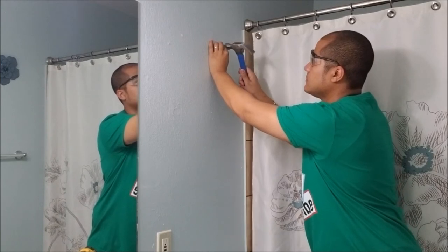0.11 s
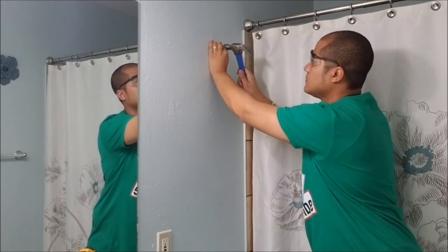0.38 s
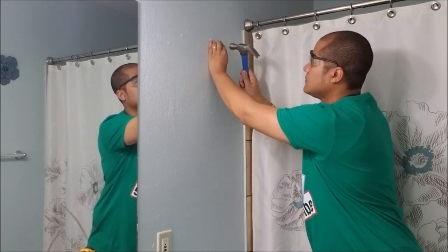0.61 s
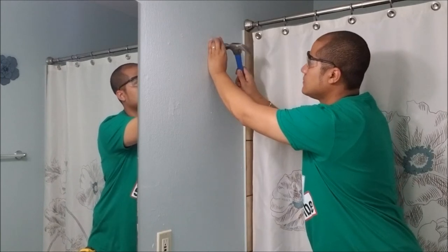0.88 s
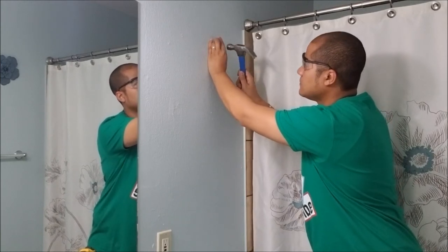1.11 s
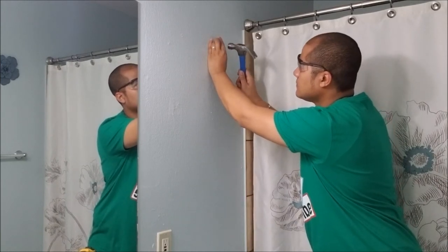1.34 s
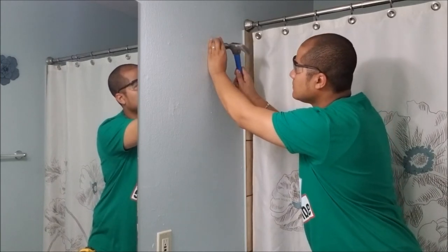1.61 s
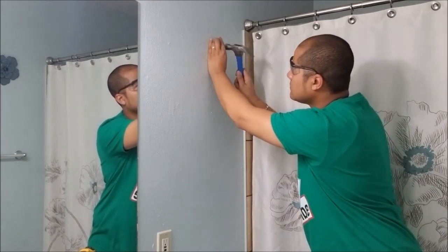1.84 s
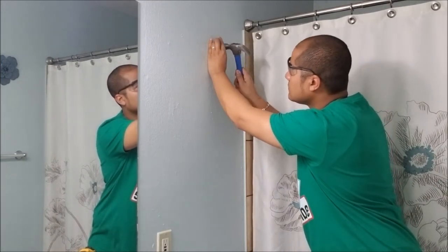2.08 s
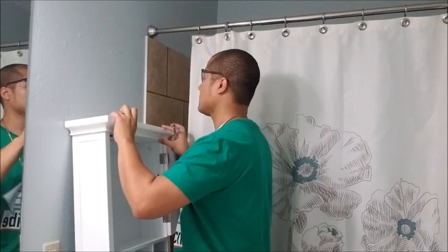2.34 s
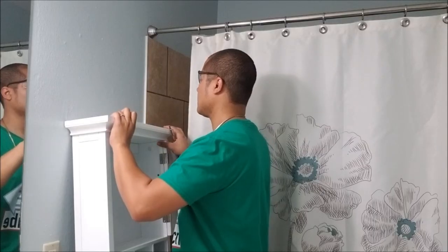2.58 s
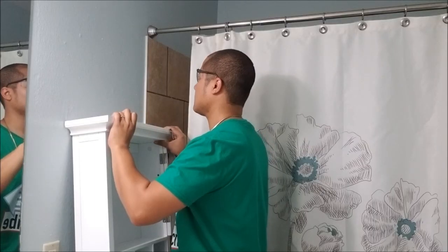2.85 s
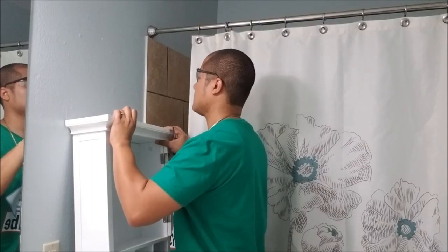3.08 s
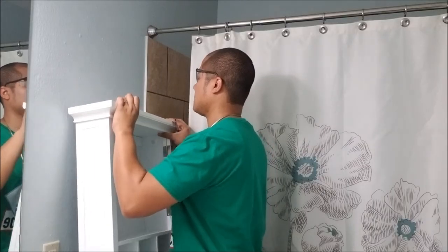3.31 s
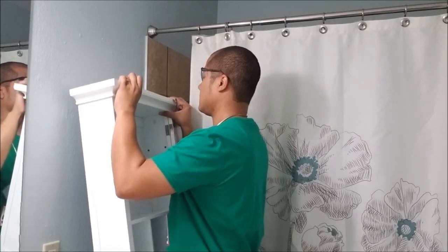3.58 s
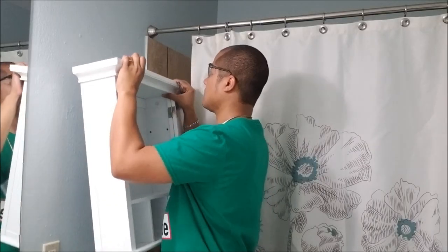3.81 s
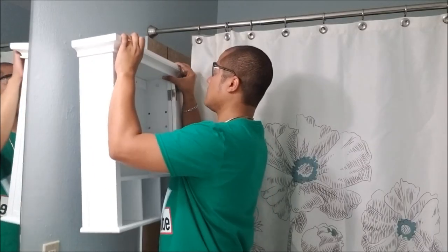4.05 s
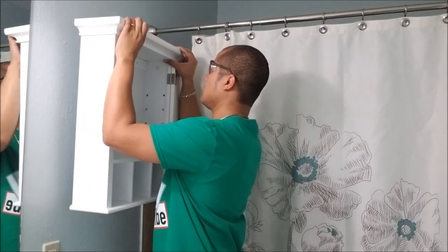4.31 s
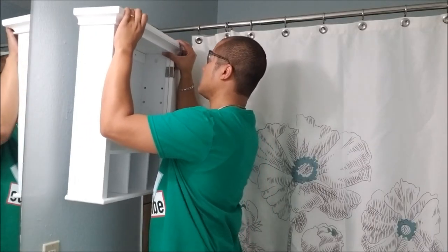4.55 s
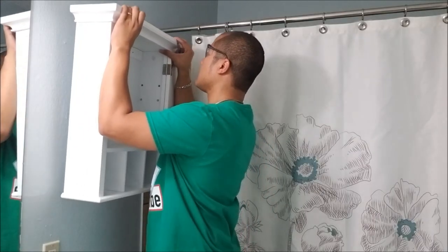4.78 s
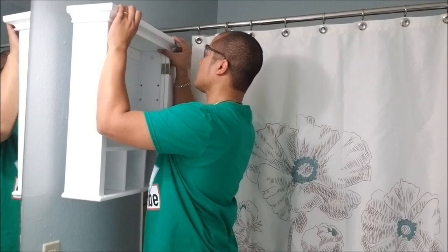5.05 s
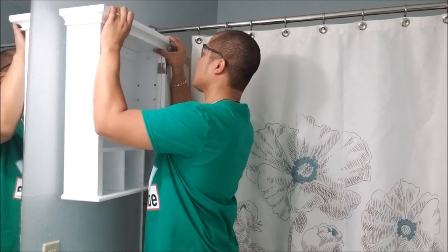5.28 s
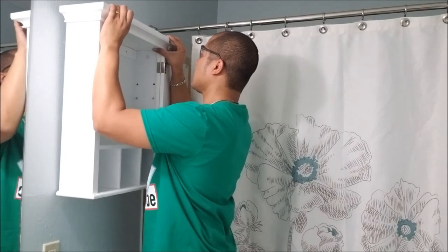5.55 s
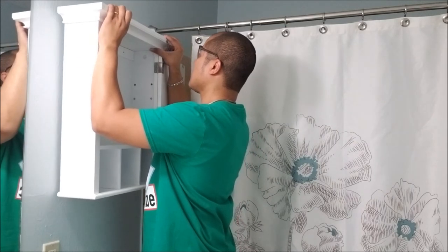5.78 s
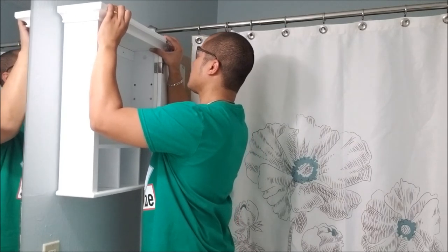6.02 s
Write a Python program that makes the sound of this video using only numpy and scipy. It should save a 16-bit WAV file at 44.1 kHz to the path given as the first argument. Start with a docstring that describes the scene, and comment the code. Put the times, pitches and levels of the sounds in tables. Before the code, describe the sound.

Six uneven hammer blows on a hollow wall, then cloth rustle, wooden knocks and stuttering slides over low room hum, ending in a heavy bump.

```python
"""In a small tiled bathroom, a hammer taps an anchor into a hollow wall, and the blows grow deeper and boomier.
Then a wooden cabinet is set down, slid up the wall with stutters and knocks, and bumped into place.
Cloth rustles over a low, wavering room hum, with small ticks, swishes, a clack and a scrape.
Hits ring the decaying tones (modes) of wall, cabinet and hammer head; fading noise makes their room echo.
Rubbing and hum are coloured noise; sliding wood is a stream of random grains that ring the cabinet."""
import sys
import numpy as np
from scipy import signal
from scipy.io import wavfile
from scipy.ndimage import uniform_filter1d, minimum_filter1d

SR = 44100
rng = np.random.default_rng(int(sys.argv[2]) if len(sys.argv) > 2 else 0)


def generate_wav(signal):
    """Clip the signal to [-1, 1] and save it as 16-bit WAV at the path in sys.argv[1]."""
    frames = np.transpose(np.atleast_2d(signal))
    scaled = np.clip(frames, -1, 1) * 32767
    pcm = np.round(scaled).astype(np.int16)
    wavfile.write(sys.argv[1], SR, pcm)


def invert_db(level):
    """Linear amplitude ratio for a level in decibels (20 dB per decade), elementwise."""
    return 10 ** (np.asarray(level, dtype=float) / 20)


N = 271215
LEAD = 8820   # samples made ahead of time 0, then cut off

# hammer blows: (time [s], strength [dB], boom over the knock [dB], crack over the knock [dB], snap [dB])
BLOWS = [(-0.11, -5.5, -3.5, -13, -8), (0.1987, -11.5, -4, -5.5, 0), (0.4676, -16.5, -4, -5.5, -3),
         (0.92, -15.5, -2.5, -8, -4), (1.2575, -7.5, 0.5, -8.5, 1.5), (1.6086, -4.5, 2.5, -11, -9.5),
         (1.9745, -5, 2, -14, -13)]
# ringing tones of the cabinet: (pitch [Hz], level [dB], time to fall 60 dB [s])
CABINET = [(76, -11, 0.12), (112.1, -1, 0.44), (172.9, -2.5, 0.32), (215.3, 0, 0.26), (285, 0, 0.18),
           (396, -3, 0.13), (518, -8, 0.12), (545, -8.5, 0.23), (588, 1, 0.14), (649, -6, 0.13),
           (821, -7, 0.053), (948.6, -1, 0.069), (1053, -14, 0.15), (1343, -11, 0.035), (1680, -1, 0.083),
           (2030, -11, 0.075), (2700, -8.5, 0.18), (2970, -7, 0.12), (4100, -9, 0.12), (4600, -7, 0.081),
           (5200, -10.5, 0.15), (5730, -1, 0.055), (6900, 4, 0.055), (11450, 0, 0.037)]


def rms_one(x):
    """Scales a sound to an average (rms) strength of 1."""
    return x / np.sqrt(np.mean(x ** 2) + 1e-20)


def clock():
    """Time of every sample in seconds, negative during the lead."""
    return (np.arange(N + LEAD) - LEAD) / SR


def in_time(rows):
    """Level curve in dB, fading to silence outside its span."""
    s, db = np.transpose(rows)
    return np.interp(clock(), [s[0] - .02, *s, s[-1] + .02], [-120, *db, -120], left=-120)


def at_hz(points, hz):
    """Reads a curve at a pitch, with straight lines over log pitch."""
    points = np.array(points)
    return np.interp(np.log(hz), np.log(points[:, 0]), points[:, 1])


def clicks(times, sizes):
    """Single-sample pulses that start the decays."""
    out = np.full(N + LEAD, 1e-18)
    np.add.at(out, np.round(np.asarray(times) * SR).astype(int) + LEAD, sizes)
    return out


def ring(x, hz, t60):
    """A resonance: a click of size 1 starts a sine of height 1 that falls 60 dB in t60 seconds."""
    r, w = invert_db(-60 / (t60 * SR)), 2 * np.pi * hz / SR
    return signal.lfilter([0, np.sin(w)], [1, -2 * r * np.cos(w), r * r], x)


def drift(rate):
    """Slow random wandering of spread 1, smoothed twice at rate [Hz]."""
    r = np.exp(-80 * np.pi * rate / SR)   # one step is 40 samples
    slow = signal.lfilter([1], [1, -2 * r, r * r], rng.standard_normal((N + LEAD) // 40 + 2002))[2000:]
    return np.interp(np.arange(N + LEAD) / 40, np.arange(len(slow)), rms_one(slow))


def band_noise(low, high, order=2):
    """Noise of rms 1 between two pitches [Hz]."""
    sos = signal.butter(order, [low, high], "band", fs=SR, output="sos")
    return rms_one(signal.sosfilt(sos, rng.standard_normal(N + LEAD)))


def bands():
    """Splits noise into third-octave bands: centre [Hz], width [Hz] and a noise of rms 1 each."""
    edges_hz = 40 * 2 ** np.arange(0, 8.9, 1 / 3)
    white = rng.standard_normal((2, N + LEAD))
    for k, (low, high) in enumerate(zip(edges_hz, edges_hz[1:])):
        sos = signal.butter(2, [low, high], "band", fs=SR, output="sos")
        yield np.sqrt(low * high), high - low, rms_one(signal.sosfilt(sos, white[k % 2]))


def coloured(spectrum, patchy_db, bank):
    """Adds noise bands along a spectrum, each flickering a little; rms 1."""
    out = 0
    for hz, width, noise in bank:
        out = out + noise * np.sqrt(width) * invert_db(at_hz(spectrum, hz) + patchy_db * drift(8.9))
    return rms_one(out)


def ring_modes(at, parts, modes, ring_db):
    """Each contact pushes every mode of a body, with random strength and direction."""
    soft_cycles = 0.37   # a push is smoothed over this many cycles of its mode
    chance = rng.standard_normal((len(at), 2 * len(modes)))
    out = 0
    for k, (hz, level_db, t60) in enumerate(modes):
        # boom drives modes up to 300 Hz, knock up to 1500, crack up to 5000, tick those above
        push_db = parts[:, np.searchsorted([300, 1500, 5000], hz)]
        size = invert_db(push_db + level_db + ring_db + 2 * chance[:, 2 * k]) * np.sign(chance[:, 2 * k + 1])
        soft = np.exp(-hz / (soft_cycles * SR))
        gain = (1 - soft) * np.hypot(1, 2 * np.pi * soft_cycles)   # makes up for the smoothing
        out = out + ring(signal.lfilter([gain], [1, -soft], clicks(at, size)), hz, t60)
    return out


def struck(rows, modes, bank, ring_db, snap_db, tail_db, tail_share, top_tilt_db, build_s):
    """Each contact gives a short snap, rings the body's modes and leaves a room tail that dies band by band."""
    # middles [Hz] and widths [Hz] of the four parts: boom, knock, crack, tick
    part_hz = [150, 700, 2700, 8500]
    part_width_hz = [220, 1200, 3500, 9000]
    # how long the room rings: (pitch [Hz], time to fall 60 dB [s], later scaled by tail_share)
    room_t60 = [(60, 0.2), (160, 0.48), (420, 0.45), (1100, 0.34), (2910, 0.3), (7680, 0.29)]
    build_cycles = 2.5   # low echoes need at least this many cycles to build up
    rows = np.array(rows)
    at, snap, parts = rows[:, 0], rows[:, 1], rows[:, 2:]
    out = ring_modes(at, parts, modes, ring_db)
    per_hz = parts - 10 * np.log10(part_width_hz)
    loudest = np.maximum(per_hz[:, 2], per_hz[:, 3] + 6)
    brief = invert_db(-120 / (.008 * SR))   # snap energy falls 60 dB in 8 ms
    for hz, width, noise in bank:
        db = np.array([at_hz(list(zip(part_hz, p)), hz) for p in per_hz])
        # tilts in dB per octave, above 9000 Hz and below 90 Hz
        db += top_tilt_db * max(np.log2(hz / 9000), 0) - 14.0 * max(np.log2(90 / hz), 0)
        # echoes build up, then fade; low down, where the modes ring, they are weaker
        build = np.exp(-1 / (max(build_s, build_cycles / hz) * SR))
        fade = invert_db(-120 / (tail_share * at_hz(room_t60, hz) * SR))
        start_db = db + tail_db - 6.04 * np.clip(np.log2(1500 / hz), 0, 1)
        tail = clicks(at, invert_db(2 * start_db))   # doubled dB: energy
        energy = signal.lfilter([1 - build], np.convolve([1, -fade], [1, -build]), tail)
        if hz > 900:
            burst_db = np.minimum(db - loudest, 0) + snap + snap_db
            energy += signal.lfilter([1], [1, -brief], clicks(at, invert_db(2 * burst_db)))
        out = out + noise * np.sqrt(np.abs(energy) * width)
    return out


def without_deep_bass(x):
    """What lies below 68 Hz is cut, so the struck sounds carry no deep bass."""
    return signal.sosfilt(signal.butter(4, 68, "high", fs=SR, output="sos"), x)


def strokes(rows):
    """Loudness of rubbing strokes that swell, hold and let go."""
    attack_s, release_s = 0.065, 0.11
    gain = 0
    for s, length, db in rows:
        shape = np.interp(clock(), [s - attack_s, s, s + length, s + length + release_s], [0, 1, 1, 0])
        gain = gain + invert_db(db) * shape ** 2
    return gain


def blow_parts():
    """Splits the hammer blows into rows of (time [s], snap, boom, knock, crack, tick [dB])."""
    s, strength, weight, hardness, snap = np.transpose(BLOWS)
    crack = strength + hardness
    return np.transpose([s, snap, strength + weight, strength, crack, crack - 12])


def hammer(bank):
    """Hammer blows shake the hollow wall, which booms in its own modes."""
    # ringing tones of the wall: (pitch [Hz], level [dB], time to fall 60 dB [s])
    wall = [(79, -18, .3), (97.7, -9, 0.27), (115.35, -2, 0.43), (143.8, -9.5, 0.27), (167.8, -3, 0.46),
            (190.4, -1.5, 0.45), (215.3, -8, 0.4), (267, -8, 0.45), (382.3, -4.5, 0.39), (507.4, -17, 0.34),
            (533.6, -7, 0.36), (578, -5, 0.25), (613, -8, 0.22), (654, -15, 0.28), (720, -14.5, 0.37),
            (784, -15.5, .3), (860, -13, 0.3), (966, -14, 0.29), (1026, -21, 0.18), (1133, -10.5, 0.19),
            (1319, -22.5, 0.34), (1344, -17, 0.33), (1500, -10, 0.16), (1714, -2.5, 0.28)]
    return without_deep_bass(struck(blow_parts(), wall, bank, ring_db=-4.0, snap_db=-45, tail_db=-2.5,
                                    tail_share=1.054, top_tilt_db=-29.5, build_s=0.0026))


def head():
    """Steel on plastic: a few short high modes, struck a little differently each time."""
    # ringing tones of hammer head and anchor: (pitch [Hz], level [dB], time to fall 60 dB [s])
    head_modes = [(1800, -2, 0.012), (2960, -13.5, .008), (5150, -13, 0.017), (6410, -8.5, .012),
                  (7100, -9.5, 0.011), (11000, -5.5, .006), (13500, -15.5, 0.0065)]
    rows = np.array(BLOWS)
    chance = rng.standard_normal((len(rows), len(head_modes)))
    out = 0
    for k, (hz, db, t60) in enumerate(head_modes):
        sizes = invert_db(rows[:, 4] + db - 7.5 + 5.0 * chance[:, k])
        out = out + ring(clicks(rows[:, 0], sizes), hz, t60)
    return out


def rumble():
    """The deepest bass swells a moment after each contact shakes the wall."""
    floor_db, swell_db = -56, -41.5
    follows, crest_s = 0.23, 0.033   # share of the boom's dB that is added; time to the crest
    contacts = np.vstack([blow_parts(), knock_parts()])
    r = np.exp(-1 / (crest_s * SR))
    pushes = clicks(contacts[:, 0], invert_db(2 * (swell_db + follows * contacts[:, 2])))
    swell = signal.lfilter([np.e * (1 - r)], [1, -2 * r, r * r], pushes)
    return np.sqrt(invert_db(2 * floor_db) + np.abs(swell)) * band_noise(22, 38)


def hum(bank):
    """Low room hum: coloured noise that jumps louder near 2.3 s, then drifts."""
    # course of the hum: (time [s], level [dB])
    hum_level = [(0, -41), (.8, -48), (2.27, -50.5), (2.4, -37.5), (4.3, -42), (5.3, -44), (6.15, -42)]
    # colour of the hum: (pitch [Hz], level per Hz [dB])
    hum_colour = [(12, -39), (20, -36), (70, -3), (123, 1.5), (198, 3), (434, -19), (574, -12.5),
                  (780, -21), (1290, -36), (3160, -43), (9670, -47.5), (14300, -58), (16000, -66.5)]
    return invert_db(in_time(hum_level)) * coloured(hum_colour, .5, bank)


def rustle(bank):
    """Cloth and skin rub: coloured noise follows the effort of the arms."""
    # course of the rubbing: (time [s], level [dB])
    rustle_level = [(0, -67.5), (.75, -66), (1.3, -67.5), (2.25, -73.5), (2.48, -55), (2.95, -61.5),
                    (3.15, -63), (3.7, -53.5), (4.05, -53), (4.32, -59.5), (4.79, -53), (4.98, -63.5),
                    (5.5, -68), (5.8, -74)]
    # colour of the rubbing: (pitch [Hz], level per Hz [dB])
    rustle_colour = [(710, -18), (1200, 4), (1660, -5), (1790, -0.5), (2200, -7), (2560, -5.5),
                     (11300, -13), (13900, -26.5), (16000, -15)]
    return invert_db(in_time(rustle_level)) * coloured(rustle_colour, .7, bank[12:])   # from 640 Hz up


def ticks():
    """Tiny touches of hard edges ring two short modes each."""
    # ticks and pings, lower mode: (time [s], level [dB], pitch [Hz], time to fall 60 dB [s])
    touches = [(0.0957, -48, 11000, .005), (0.295, -45, 11500, .005), (0.4184, -42, 6000, .004),
               (0.4675, -14.5, 5600, .012), (0.641, -45, 10500, .004), (0.7846, -45, 9500, .003),
               (0.9205, -17, 5150, 0.027), (1.2575, -13, 6060, 0.016), (1.5673, -54, 5200, .008),
               (2.156, -45, 7070, 0.023), (2.67, -38, 4500, 0.027), (2.7201, -32, 4540, 0.036),
               (2.848, -36, 4900, 0.022), (5.9663, -42, 3030, 0.036)]
    out = 0
    for s, db, hz, t60 in touches:
        out = out + ring(clicks([s], invert_db(db)), hz, t60)
        out = out + ring(clicks([s], invert_db(db - 4.5)), 1.14 * hz, 0.52 * t60)
    return out


def swishes():
    """A hand brushes paint: bright noise under bell-shaped swells."""
    # brushes: (time of the crest [s], level [dB], length from crest to 1/e [s])
    brushes = [(0.734, -65.5, .09), (2.504, -49, 0.034), (4.78, -53.5, 0.061), (5.325, -57, 0.021),
               (5.401, -59, 0.032), (5.602, -57.5, 0.032)]
    t = clock()
    return band_noise(7000, 13000) * sum(invert_db(db) * np.exp(-((t - s) / length) ** 2) for s, db, length in brushes)


def knock_parts():
    """Splits the cabinet contacts into rows like the hammer's: the harder the touch, the more treble."""
    # cabinet touching wall, hand and ledge:
    # (time [s], strength [dB], boom over the knock [dB], tick over the knock [dB])
    knocks = [(2.3217, -40.5, -4, -3.5), (2.4872, -25.5, -20, -23), (2.534, -33.5, -1, -30),
              (2.57, -39, -16, -6.5), (2.631, -53, 0, -11), (2.6698, -34.5, -17, -9),
              (2.7198, -33, 2, -1.5), (2.7388, -20, 12, -31), (2.823, -33.5, 16.5, -13),
              (2.8488, -28.5, 3, -7.5), (2.973, -33, -9, -21), (3.699, -26.5, -1.5, -27),
              (3.8484, -29.5, -15, -31), (3.8877, -28.5, -24, -29), (3.92, -25.5, -5, -30),
              (3.9765, -24, -3, -26.5), (4.0788, -31.5, 0, -32), (4.149, -32.5, -12, -23),
              (4.2532, -28.5, -25, -28), (4.2796, -28, -1, -26.5), (4.3081, -26.5, -12, -27.5),
              (4.3608, -29, -3.5, -25), (4.4677, -29, -2, -27), (4.547, -27.5, -1, -26),
              (4.6354, -27.5, 2, -31), (4.664, -26.5, -2, -31), (4.6918, -25, -5, -31),
              (4.8579, -45.5, 2, 2.5), (4.924, -35, -1, -18), (5.013, -31, 2.5, -25.5),
              (5.065, -40, 9, -24), (5.1596, -33.5, -10, -24.5), (5.229, -33.5, 3, -25),
              (5.3454, -29.5, -18, -29.5), (5.6304, -26, 1, -50), (5.967, -15, 10, -36.5),
              (5.9868, -22.5, 14, -23)]
    s, strength, weight, hardness = np.transpose(knocks)
    tick = strength + hardness
    crack = strength + 0.8 * hardness
    return np.transpose([s, tick + 13.5, strength + weight, strength, crack, tick])


def cabinet(bank):
    """The wooden cabinet knocks and bumps, ringing its own modes."""
    return without_deep_bass(struck(knock_parts(), CABINET, bank, ring_db=-7.5, snap_db=-43.5, tail_db=-7.0,
                                    tail_share=0.99, top_tilt_db=-16, build_s=0.00083))


def clack():
    """A loose panel clacks: a snap, then fading noise shakes the panel's broad resonances."""
    # the clack: (time [s], snap level [dB], body level [dB], fall time [s], shortened below)
    s, snap_db, body_db, t60 = (2.3375, -15.5, -19.5, 0.3959)
    # resonances of the panel: (pitch [Hz], width [Hz], at least 40 is used, level [dB])
    panel = [(587, 52, 3), (970, 130, -2), (1385, 65, -3), (1617, 67, -13), (2000, 44, -15),
             (2620, 62, -13.5), (3040, 31, -24), (3800, 120, -24), (4060, 33, -13), (4670, 200, -17),
             (5090, 80, -15.5), (5600, 31, -10), (5660, 35, -22), (6200, 38, -33), (6760, 22, -44),
             (7840, 54, -46), (10900, 21, -37), (11900, 170, -31)]
    t = np.arange(SR // 2) / SR
    white = rng.standard_normal(len(t))
    body = 0
    for hz, width, db in panel:
        r = np.exp(-np.pi * max(width, 40) / SR)
        echoes = white * invert_db(-60 * t / t60 * (1.5 + hz / 30000))   # high echoes die sooner
        poles = [1, -2 * r * np.cos(2 * np.pi * hz / SR), r * r]
        body = body + invert_db(db) * signal.lfilter([(1 - r * r) / 2, 0, (r * r - 1) / 2], poles, echoes)
    # a gap where the panel hardly radiates
    body = signal.sosfilt(signal.butter(2, [3150, 3550], "bandstop", fs=SR, output="sos"), body)
    body = signal.sosfilt(signal.butter(2, 6800, fs=SR, output="sos"), body)
    body /= np.std(body[:SR // 30])
    snap = invert_db(snap_db - 60 * t / 0.01) * signal.lfilter([.5, .5], [1, -.4], rng.standard_normal(len(t)))
    out, at = np.zeros(N + LEAD), round(s * SR) + LEAD
    out[at:at + len(t)] = invert_db(body_db) * body + snap
    return out


def slide():
    """Wood sticks and slips on the wall: uneven grains shake the middle modes of the cabinet."""
    # strokes of the slide: (start [s], length [s], level [dB])
    slide_strokes = [(2.46, 0.65, -49), (3.55, 0.19, -46), (3.92, 0.15, -37.5), (4.26, 0.12, -44.5),
                     (4.45, 0.88, -54)]
    born = rng.random(N + LEAD) < 500 * invert_db(2.5 * drift(25)) / SR   # around 500 grains a second
    sizes = born * invert_db(4.5 * np.minimum(rng.exponential(1, N + LEAD), 4))
    out = 0
    for hz, level_db, t60 in CABINET[5:14]:
        grains = sizes * rng.standard_normal(N + LEAD) + 1e-18
        out = out + invert_db(level_db) * ring(grains, hz, 0.5 * t60)   # dies twice as fast as when struck
    return rms_one(out) * strokes(slide_strokes)


def whistle():
    """Dragging wood whistles faintly: noise through one narrow resonance at 2000 Hz."""
    # whistling strokes: (start [s], length [s], level [dB])
    whistle_strokes = [(4.27, 0.3, -57.5), (5.41, 0.15, -71)]
    return rms_one(ring(rng.standard_normal(N + LEAD), 2000, 0.044)) * strokes(whistle_strokes)


def bumps():
    """Soft low bumps felt through the floor: softened pushes start a few slow swings each."""
    # bumps: (time [s], level before softening [dB], pitch [Hz])
    floor_bumps = [(4.708, -26, 60), (5.014, -23, 50), (5.067, -25, 55)]
    out = 0
    for s, db, hz in floor_bumps:
        push = signal.lfilter([.03], [1, -.97], clicks([s], invert_db(db)))
        out = out + ring(push, hz, 0.066)
    return out


def scrape():
    """An edge scrapes paint: gritty noise in one broad band starts at once and dies."""
    # the scrape: (time [s], level [dB], pitch [Hz], width [Hz], time to fall 60 dB [s])
    s, db, hz, width, t60 = (4.858, -44, 2900, 700, 0.33)
    fade = signal.lfilter([1], [1, -invert_db(-60 / (t60 * SR))], clicks([s], invert_db(db)))
    return band_noise(hz - width / 2, hz + width / 2, order=1) * fade


def scene():
    """Adds all the sounds and cuts off the lead."""
    echoes = list(bands())
    air = [(hz, width, noise[::-1]) for hz, width, noise in echoes]   # the same noise backwards is unrelated
    hammering = hammer(echoes) + head() + rumble()
    background = hum(air) + rustle(air)
    small = ticks() + swishes() + bumps() + scrape()
    moving = cabinet(echoes) + clack() + slide() + whistle()
    return (hammering + background + small + moving)[None, LEAD:]


def top_cut(x):
    """Nothing passes above the cut-off."""
    return signal.sosfilt(signal.butter(12, 16540, fs=SR, output="sos"), x)


def record(dry):
    """The microphone loses the very top; a limiter holds the loudest peaks down and lets go slowly."""
    limit_db, release_db_per_s = 0.37, 131
    dry = signal.sosfilt(signal.butter(6, 14500, fs=SR, output="sos"), dry)
    over_db = np.maximum(20 * np.log10(np.abs(dry) + 1e-9) - limit_db, 0)
    slope = release_db_per_s * np.arange(N) / SR
    held_db = np.maximum.accumulate(over_db + slope, axis=1) - slope
    # the limiter looks a little ahead and moves smoothly
    widened_db = -minimum_filter1d(-held_db, size=41, axis=1)
    ahead_db = uniform_filter1d(widened_db, size=41, axis=1)
    return top_cut(np.clip(dry * invert_db(-ahead_db), -1, 1))


dry = scene()
out = record(dry)
generate_wav(out)
```